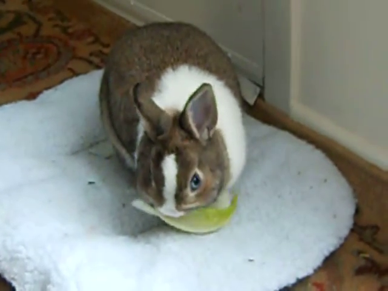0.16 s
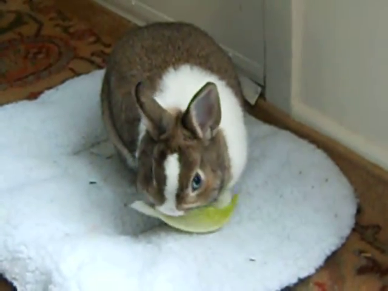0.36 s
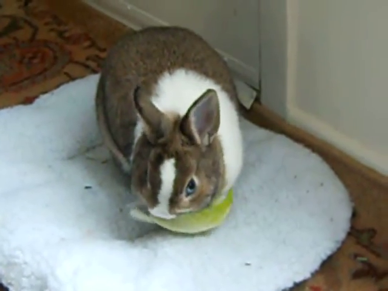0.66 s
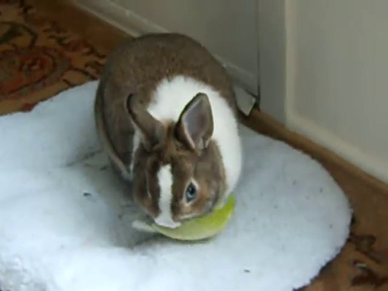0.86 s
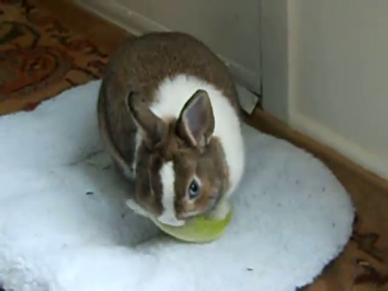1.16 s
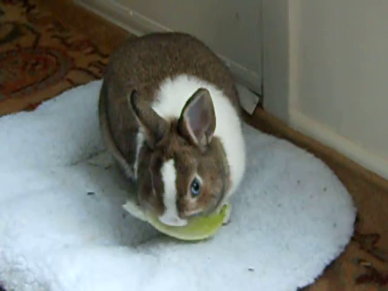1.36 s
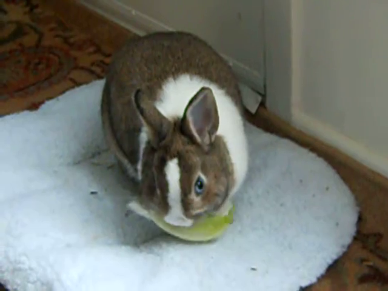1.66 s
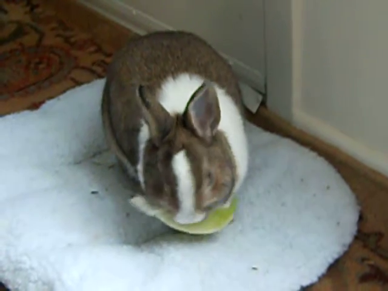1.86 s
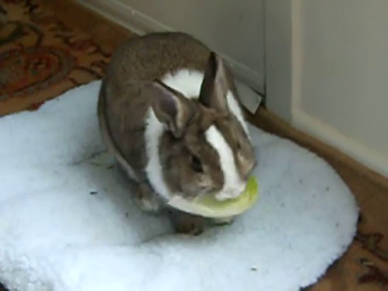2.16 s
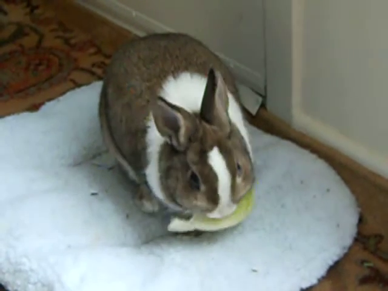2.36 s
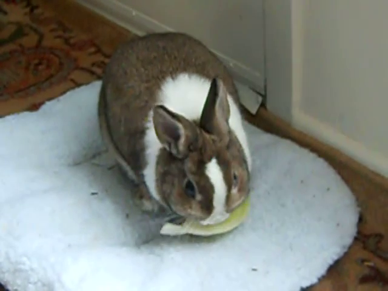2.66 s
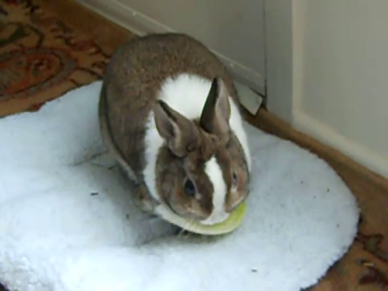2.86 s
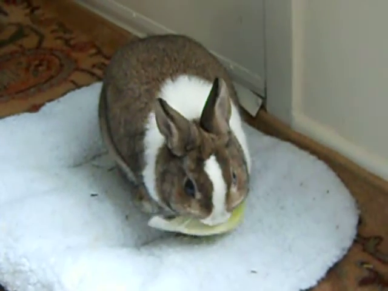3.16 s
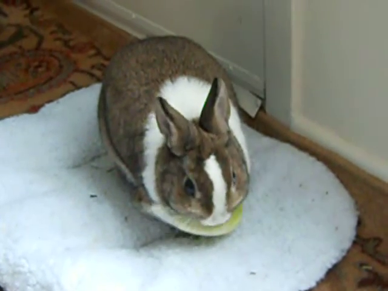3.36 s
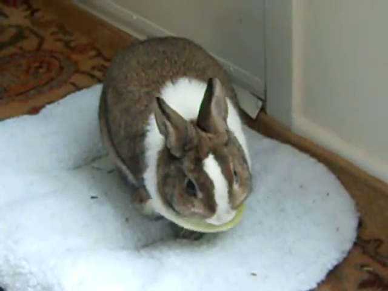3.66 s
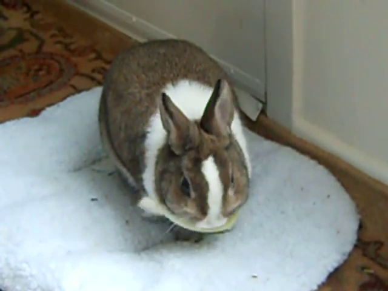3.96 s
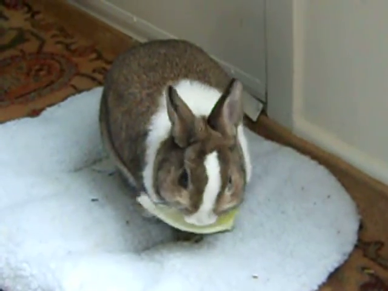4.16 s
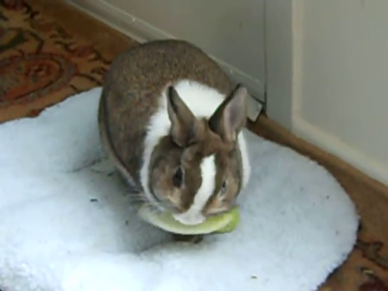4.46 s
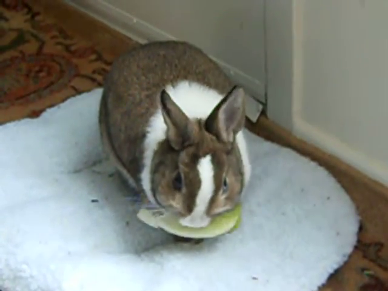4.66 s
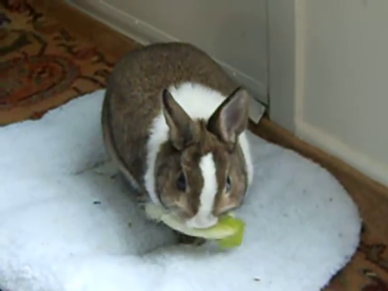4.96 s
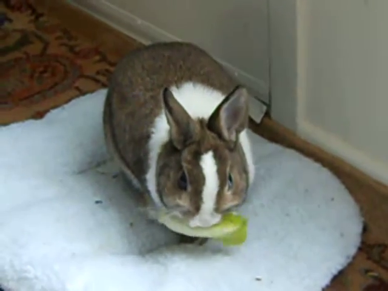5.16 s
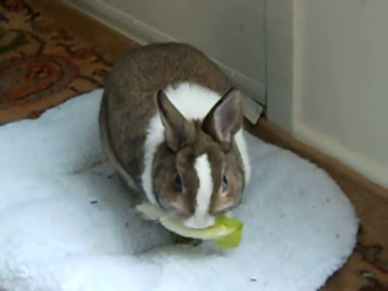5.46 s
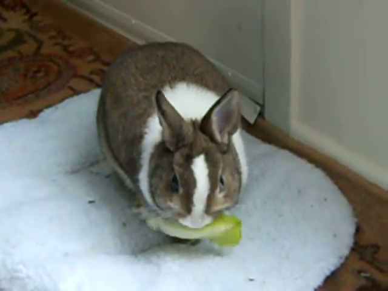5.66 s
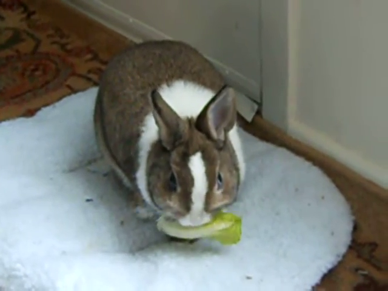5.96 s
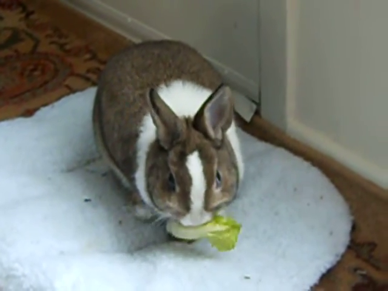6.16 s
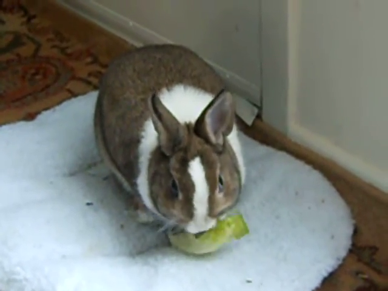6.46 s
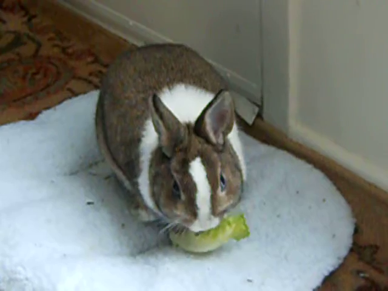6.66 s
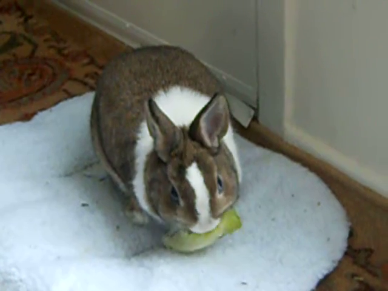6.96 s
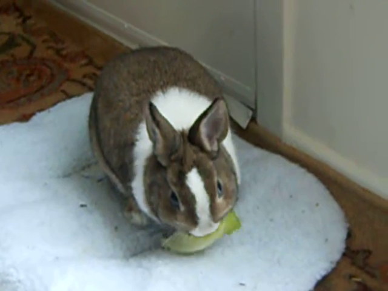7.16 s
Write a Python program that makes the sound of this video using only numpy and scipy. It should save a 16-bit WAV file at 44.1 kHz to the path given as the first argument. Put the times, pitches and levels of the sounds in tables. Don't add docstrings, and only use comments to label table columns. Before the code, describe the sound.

Small brittle crunches of lettuce between a rabbit's teeth, irregular and close, with tiny tears, ticks and a few hollow stalk knocks. After a sparse start the chewing quickens, thins out after five seconds, and returns in a brief burst past six. Constant soft hiss and low indoor hum surround it; a faraway engine drones early, then gives way to a low boom. Mono, modest quality, little echo.

```python
import sys
import numpy as np
from scipy import signal
from scipy.fft import rfft, irfft, next_fast_len
from scipy.io import wavfile
from scipy.ndimage import map_coordinates

SR = 44100
rng = np.random.default_rng(int(sys.argv[2]) if len(sys.argv) > 2 else 0)


def volts_from_decibels(level):
    exponent = np.asarray(level, float) / 20
    return 10 ** exponent


def generate_wav(sig):
    pcm = np.round(np.clip(np.atleast_2d(sig).T, -1, 1) * 32767).astype(np.int16)
    wavfile.write(sys.argv[1], SR, pcm)


N = 322747


def unit(x):
    return x / np.sqrt(np.mean(x ** 2) + 1e-20)


def along(points, hz):
    point_hz, value = np.transpose(points)
    return np.interp(np.log(hz + 1), np.log(point_hz + 1), value)


def coloured(x, points):
    m = next_fast_len(N + 8192)
    gain = volts_from_decibels(along(points, np.fft.rfftfreq(m, 1 / SR)))
    return irfft(rfft(x, m) * gain, m)[..., :N]


def wobble(rate):
    knots = rng.standard_normal(int(N * rate / SR) + 4)
    return map_coordinates(knots, [np.arange(N) * rate / SR])


def tone(hz, drift_hz):
    cycles = np.cumsum(hz + drift_hz * wobble(3.106)) / SR
    return np.sqrt(2) * np.sin(2 * np.pi * (cycles + rng.random()))


def swells(rows):
    t = np.arange(N) / SR
    return sum(volts_from_decibels(db) * np.exp(-((t - s) / half) ** 2) for s, half, db in rows)


# pitch_hz, level_db (per Hz)
RUMBLE = [(10, -30), (25, -3.5), (40, -4), (75, -3), (120, -2), (150, -1), (190, -7), (230, -6.5),
          (280, -10), (310, -5.5), (345, -13.5), (450, -21), (900, -51.5)]
# pitch_hz, level_db (per Hz)
HISS = [(15, -15.5), (60, 0), (300, 2.5), (500, 2.5), (800, 2), (1200, -0.5), (1800, -2.5), (2600, -4),
        (4200, -6.5), (5500, -7), (7000, -7.5)]


def air():
    rumble = unit(coloured(rng.standard_normal(N), RUMBLE))
    hiss = unit(coloured(rng.standard_normal(N), HISS + [(9000, -11.5), (9500, -120)]))
    rumble_db = -43.0 + 0.95 * wobble(0.913)
    hiss_db = -40.5 + 0.15 * wobble(1.1)
    return volts_from_decibels(rumble_db) * rumble + volts_from_decibels(hiss_db) * hiss


# pitch_hz, level_db (rms)
MOTORS = [(58.75, -45.5), (108.75, -45), (828, -60), (1087, -63.5), (7656, -69), (7715, -73)]


def motors():
    return sum(volts_from_decibels(db + 1.2 * wobble(4)) * tone(hz, drift_hz=0.082) for hz, db in MOTORS)


# middle_s, half_length_s, level_db
LOW_HUM_SWELLS = [(.3, 0.36, -51), (.95, 0.37, -53), (1.62, .2, -43), (2.15, .12, -51), (2.88, 0.46, -47),
                  (3.65, 0.14, -54), (4.15, 0.29, -47), (5.3, 0.17, -44), (5.75, 0.26, -42), (6.24, 0.14, -42),
                  (6.72, 0.3, -40.5), (7.22, 0.25, -41.5)]


def low_hum():
    return volts_from_decibels(0.8) * swells(LOW_HUM_SWELLS) * tone(90.9, drift_hz=0.23)


ENGINE_HZ = [123, 165.5, 205.1, 248]
# order, middle_s, half_length_s, level_db
ENGINE_SWELLS = [(3, .3, .3, -52), (3, 1.2, .5, -55), (3, 2.3, .15, -44), (3, 2.8, .4, -46.5),
                 (3, 3.6, .3, -55), (3, 4.05, .1, -47), (3, 4.4, .2, -53), (3, 4.97, .12, -48),
                 (4, .15, .1, -44.5), (4, .6, .2, -45), (4, 1.1, .3, -47), (4, 1.55, .18, -44.5),
                 (4, 2.1, .1, -46), (4, 2.4, .12, -45), (4, 2.88, .18, -42.5), (4, 3.75, .2, -47),
                 (4, 4.3, .25, -54), (5, .3, .5, -48), (5, 1.05, .3, -47), (5, 1.58, .3, -41),
                 (5, 2.38, .33, -43), (5, 3.03, .12, -48), (5, 3.42, .28, -42), (5, 3.9, .2, -50),
                 (5, 4.5, .4, -52), (6, 3.8, .2, -52), (6, .4, .3, -51), (6, 1.05, .22, -44),
                 (6, 2.27, .17, -45), (6, 2.9, .18, -46)]
# time_s, level_db
ROAR = [(0, -63), (.8, -61), (1.3, -51), (2.5, -52), (3.6, -58.5), (4.2, -75), (5, -55.5), (7.32, -78)]
# pitch_hz, level_db (per Hz)
ROAR_COLOUR = [(100, -28.5), (150, 2), (190, 3), (240, 13.5), (280, -19), (400, -42.5)]


def engine():
    drone = 0
    for order, hz in enumerate(ENGINE_HZ, 3):
        humps = [row[1:] for row in ENGINE_SWELLS if round(row[0]) == order]
        drone = drone + volts_from_decibels(3.5) * swells(humps) * tone(hz, drift_hz=0.54)
    time_s, level_db = np.transpose(ROAR)
    roar_db = np.interp(np.arange(N) / SR, time_s, level_db)
    return drone + volts_from_decibels(roar_db) * unit(coloured(rng.standard_normal(N), ROAR_COLOUR))


# pitch_hz, level_db (per Hz)
LEAF = [(500, -42), (1500, -16.5), (2500, -2), (3600, -1.5), (4600, -2), (6200, -2), (7500, -2.5)]
# middle_s, half_length_s, level_db
GRIND = [(0.063, 0.078, -46.5), (1.448, .15, -55), (1.817, 0.053, -41.5), (2.04, 0.056, -46.5),
         (2.266, 0.049, -45), (2.474, .05, -41.5), (2.857, 0.066, -42.5), (3.295, 0.08, -50),
         (3.435, .05, -46), (3.713, 0.061, -44), (3.936, .05, -39), (4.173, 0.063, -52), (4.297, 0.04, -50),
         (4.487, 0.039, -42.5), (4.94, 0.04, -42), (5.08, 0.11, -45.5), (5.3, 0.092, -53),
         (6.122, .04, -57), (6.313, .07, -43), (6.55, 0.1, -49)]


def grinding():
    bursts_per_s, decay_s = 700, 0.0045
    bursts = (rng.random(N) < bursts_per_s / SR) * volts_from_decibels(1.8 * rng.exponential(size=N))
    decay = volts_from_decibels(-60 * np.arange(400) / SR / decay_s)
    puffs = signal.fftconvolve(bursts, decay)[:N] * rng.standard_normal(N)
    return swells(GRIND) * unit(coloured(puffs, LEAF))


# pitch_hz, width_hz, first_swing (direction)
RINGS = [(1300, 400, 1), (2680, 520, 1), (3600, 520, -1), (4750, 700, 1), (6100, 900, -1)]
# start_s, level_db, tilt_db (per octave)
TIPS = [(.0018, -35, 2), (1.8244, -35.5, -10.5), (2.0612, -28.5, 23), (2.0666, -26.5, 8),
        (2.0752, -30.5, -2), (2.4565, -32, 0), (2.8365, -33, 11), (3.6982, -43, -3), (3.7024, -30, -6),
        (3.929, -40, -3), (6.1361, -36, -5), (6.3176, -33, 18)]
BLADE = [(.1055, -34, 1), (.1163, -26.5, -2), (1.3723, -23.5, 2.5), (1.5259, -33.5, -2),
         (1.5343, -34.5, -7), (1.7976, -37, -1), (2.0112, -38, -3), (2.2376, -38, -8), (2.2863, -36, 0),
         (2.2889, -30.5, -3), (2.4669, -38, 5), (2.4709, -21, -1.5), (2.472, -36, -9), (2.5073, -38.5, -2),
         (2.5093, -36, -3), (2.8386, -35, 3), (2.8458, -26, 2), (2.8739, -32, -4), (4.2944, -35.5, -8.5),
         (4.3046, -33.5, 6), (4.5124, -41, 0), (4.9133, -39, -11), (4.9173, -30.5, -9), (4.9192, -38, -14),
         (6.278, -39.5, 1)]
RIB = [(2.0698, -34.5, 0), (2.3496, -40, -5), (2.8967, -36, 6), (3.3136, -36, -6), (3.3172, -31.5, -5.5),
       (3.3502, -38.5, -10), (3.7106, -24.5, -1), (3.7468, -26, 0.5), (3.7722, -39, -7), (3.8263, -35, 1),
       (3.9036, -32, -6), (3.9367, -33, 3.5), (4.1625, -39, 9), (4.2924, -33, -1), (4.307, -34.5, 9.5),
       (4.4859, -37.5, 4), (5.0606, -37.5, 7), (4.1668, -30.5, 0.5), (4.3155, -43.5, 9)]
VEINS = [(2.0717, -19, -11), (5.0764, -34, -12), (6.292, -25.5, -5.5), (6.2978, -28.5, -2),
         (6.2993, -29.5, 9), (6.3035, -25.5, -2), (6.3377, -36, 6.5), (6.3574, -38, -4),
         (6.3794, -38.5, -7)]
RIBLETS = [(2.2547, -32, 2), (2.3274, -29.5, 8), (2.3687, -38, 10), (4.872, -38.5, 0), (6.1301, -25.5, 0),
           (6.2742, -23.5, -1)]
STALK = [(2.8739, -37, -12), (2.8967, -34, -12), (3.4379, -41, 8.5), (3.4405, -45.5, 9.5),
         (3.8193, -32.5, 3.5), (3.9036, -32, -12), (4.1351, -25.5, 3), (4.1364, -19.5, -10),
         (4.1404, -29, -13), (4.199, -38.5, 3.5), (4.9173, -29, -15), (4.9192, -42, -15),
         (5.0764, -42, -12), (5.2928, -46, 8.5), (6.292, -38, -12), (6.2978, -38, -14)]
# breaks (table), pivot_hz of the tilt, colour_db (one per resonance in RINGS)
PARTS = [
    (BLADE, 4320, (-18.5, -23.5, 0, 1.5, -0.5)),
    (RIBLETS, 4600, (-16, -20, -4.5, 0.5, -8)),
    (TIPS, 5500, (-27, -8.5, -11.5, 0, 1.5)),
    (RIB, 3550, (-20.5, -1.5, -0.5, -3, -2.5)),
    (VEINS, 3600, (-25, -8.5, 1.5, -16, -1.5)),
    (STALK, 1270, (-1, 1, -16, -31, -12.5)),
]


def breaks():
    hz = np.array(RINGS)[:, 0]
    rows = []
    for table, pivot_hz, colour_db in PARTS:
        octaves = np.maximum(np.log2(hz / pivot_hz), -0.8)
        for s, db, tilt in table:
            rows.append((s, *(db + np.array(colour_db) + tilt * octaves)))
    rows = np.array(rows)
    earliest_s, spread_s, loss_db, scatter_db = 0.00147, 0.001, 11, 2
    chance = rng.random(rows.shape)
    later_s = earliest_s + spread_s * chance[:, 0]
    change_db = 2 * scatter_db * (2 * chance[:, 1:] - 1) - loss_db
    return np.vstack([rows, rows + np.c_[later_s, change_db]])


# pitch_hz, width_hz, share
EDGE = (7300, 900, .55)
# pitch_hz, width_hz, level_db (against the strongest resonance)
JAW = (1020, 1800, -15.5)
# time_s, width_factor, times (the resonance acts)
MOUTH = [(0, 1.6, 1.5), (1.4, 1.6, 1), (2.5, 1.2, 1.1), (3.8, 1.05, 1.1), (4.15, 1.05, 1.5),
         (4.9, 1.05, 1.7), (7.32, 1.25, 2)]


def snaps():
    length = 2048
    out = np.zeros(N + SR)
    t, f = np.arange(length) / SR, np.fft.rfftfreq(length, 1 / SR)
    centre, width, swing = np.transpose(RINGS + [EDGE, (*JAW[:2], 1)])[..., None]
    mouth_s, *mouth = np.transpose(MOUTH)
    for s, *ring_db in breaks():
        factor, times = (np.interp(s, mouth_s, column) for column in mouth)
        wide = np.vstack([width[0], factor * width[1:]])
        plain = 1j * f * wide / (centre ** 2 - f ** 2 + 1j * f * wide)
        shaped = swing * plain ** times
        top_and_edge = shaped[-3:-1].sum(axis=0)
        rings = np.vstack([plain[0] ** 2, shaped[1:-3], top_and_edge, plain[-1] ** 2])

        tearing, room = rng.standard_normal((2, length))
        blow = 0.04 * tearing ** 3 * volts_from_decibels(-60 * t / 0.007)
        blow += 0.02 * room * volts_from_decibels(-60 * t / 0.05)
        blow[0] = -1
        rung = irfft(rfft(blow) * rings, length)
        rung /= np.sqrt(np.sum(rung ** 2, axis=1, keepdims=True) / (SR / 1000))
        level_db = np.append(ring_db, max(ring_db) + JAW[-1]) - 0.48
        out[round(s * SR):][:length] += volts_from_decibels(level_db) @ rung
    return out[:N]


def scene():
    room = air() + motors() + low_hum() + engine()
    return (room + grinding() + snaps())[None]


def roll_off(x):
    return signal.sosfilt(signal.butter(12, 9070, fs=SR, output="sos"), x)


# pitch_hz, gain_db
BEFORE = [(7000, 0), (7400, -2), (7650, -5), (7800, -10), (7985, -14), (8005, -80)]
# pitch_hz, gain_db
AFTER = [(7600, 0.5), (8000, 0.5), (8350, -9.5), (8600, -17), (8800, -26.5), (9050, -39.5), (9300, -68.5),
         (9800, -120)]


def record(dry):
    sampling_hz = 16000
    x = coloured(dry, BEFORE)
    mirror = 2 * x * np.cos(2 * np.pi * sampling_hz * np.arange(N) / SR)
    return roll_off(coloured(x + mirror, AFTER))


dry = scene()
out = record(dry)
generate_wav(out)
```